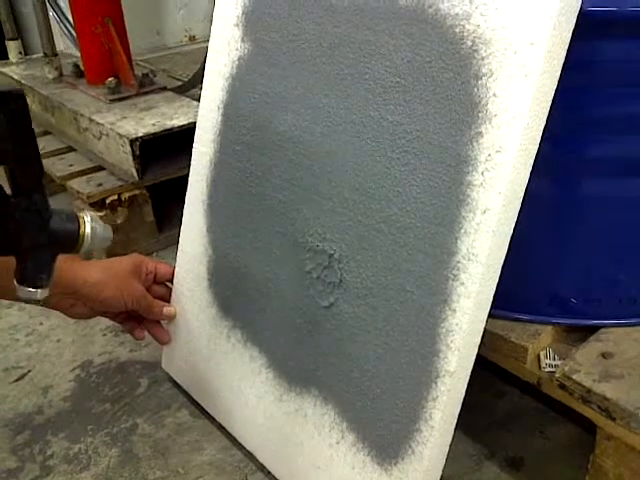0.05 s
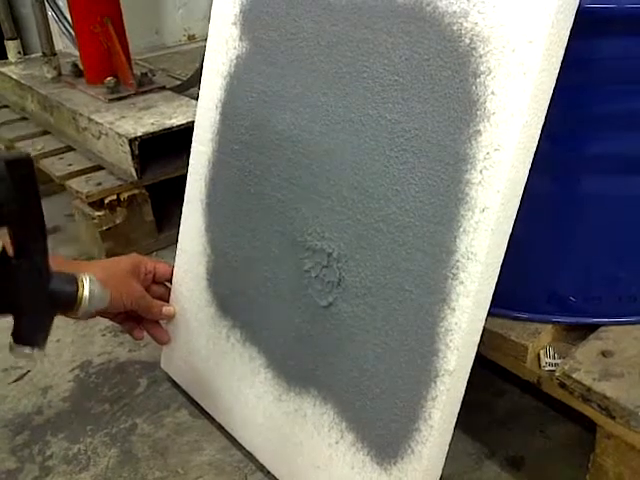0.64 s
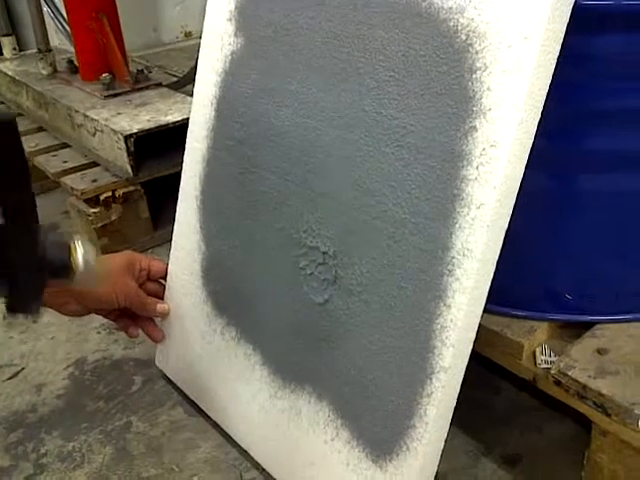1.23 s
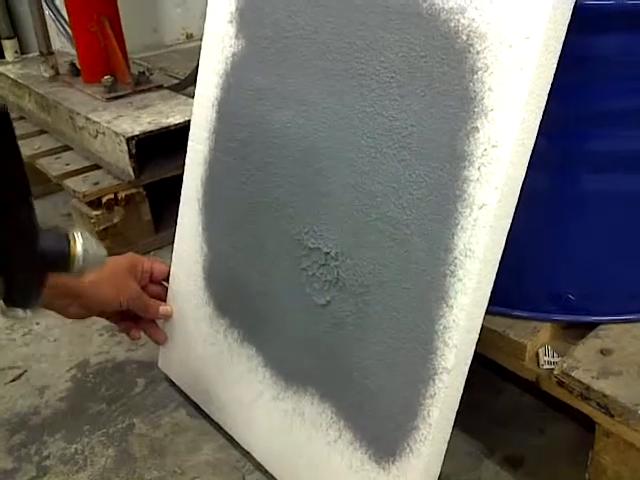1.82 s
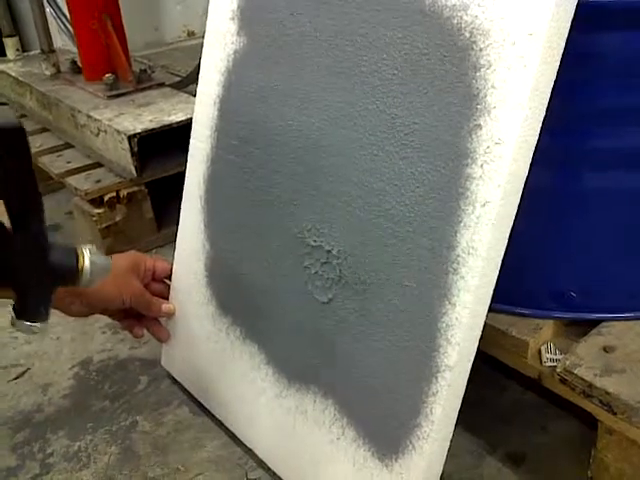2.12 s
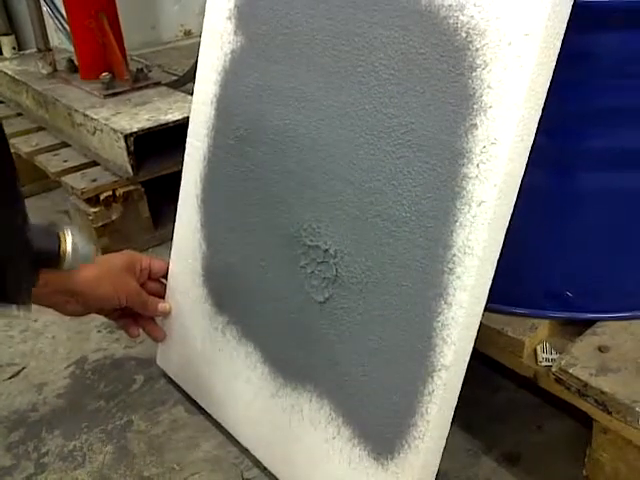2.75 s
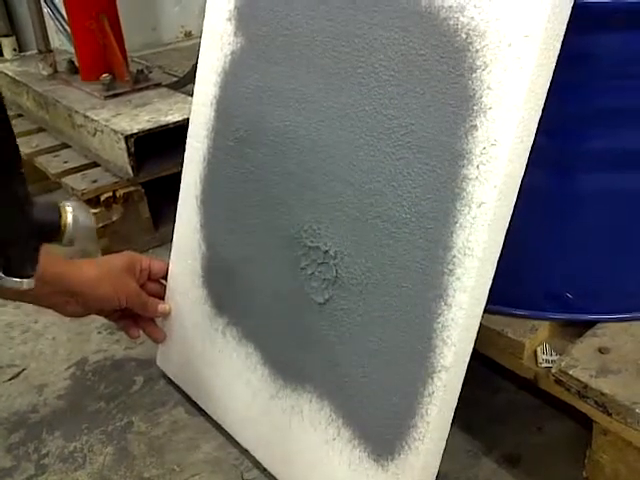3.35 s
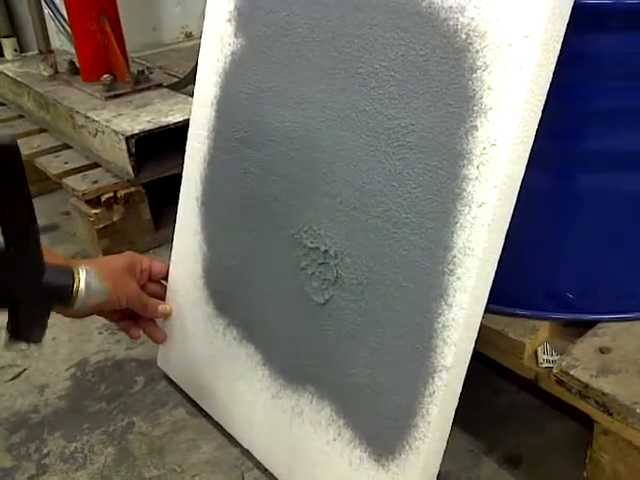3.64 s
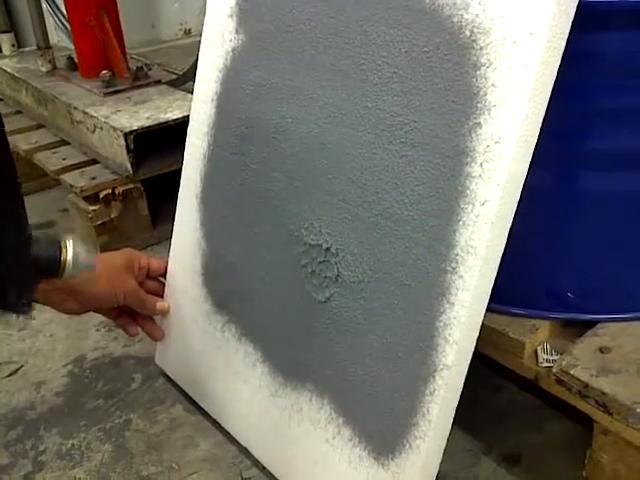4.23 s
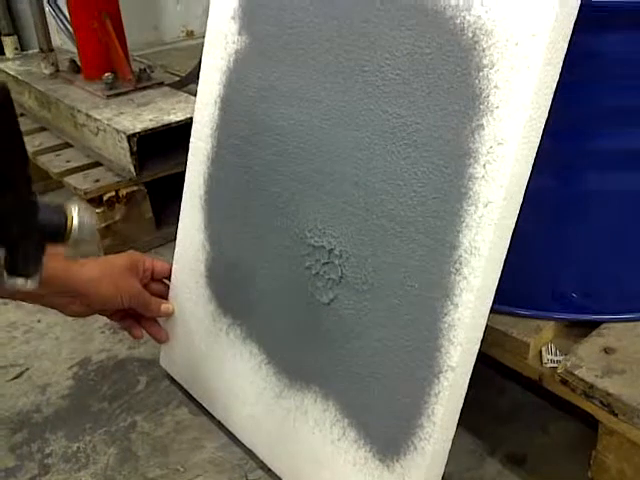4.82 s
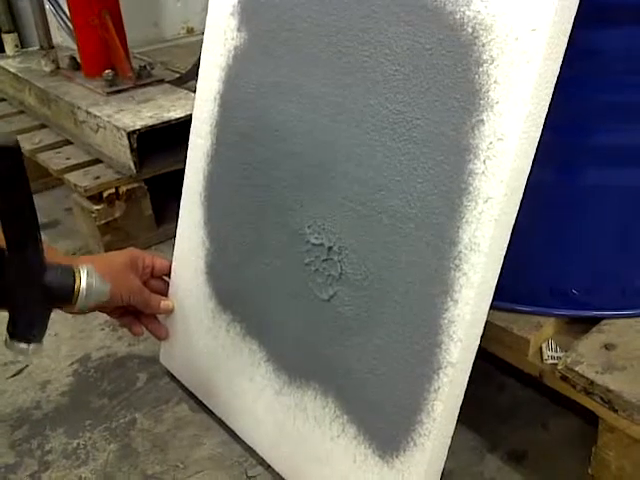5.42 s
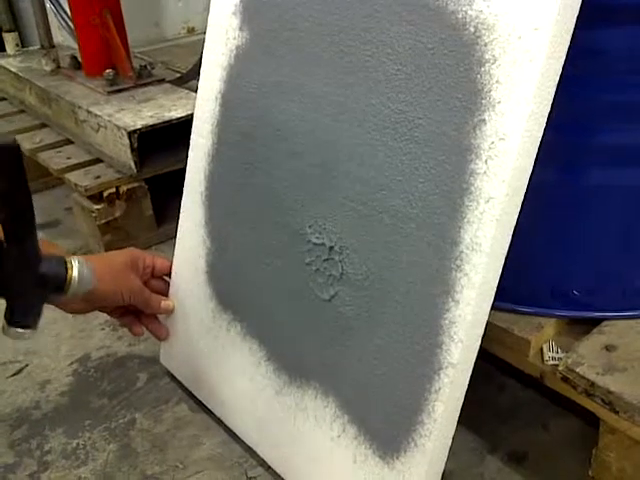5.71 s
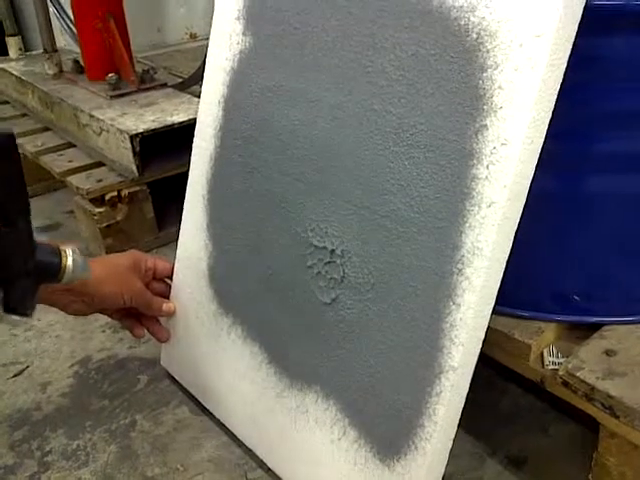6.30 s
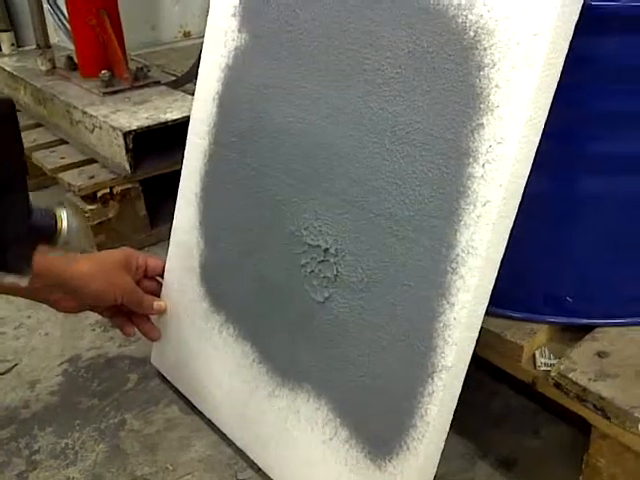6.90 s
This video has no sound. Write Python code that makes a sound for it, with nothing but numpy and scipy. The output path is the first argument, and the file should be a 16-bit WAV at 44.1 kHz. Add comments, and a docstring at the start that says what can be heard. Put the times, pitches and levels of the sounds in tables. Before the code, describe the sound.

Loud continuous hiss of a spray gun coating a board in a workshop, topped by a thin, fluttering high whistle.

```python
"""A steady hiss with a whistle near 3.6 kHz: a compressed-air spray gun coats a board in a workshop.
The turbulent jet roars and hisses; the nozzle now locks to a note, now is torn into a band by
turbulence, and a fainter note wanders below it. The gun sweeps to and fro; near 5.8 s a change of
grip recolours the hiss. A machine hums faintly behind."""
import sys
import numpy as np
from scipy import signal
from scipy.fft import rfft, irfft, next_fast_len
from scipy.io import wavfile
from scipy.ndimage import uniform_filter1d, map_coordinates

SR = 44100
rng = np.random.default_rng(int(sys.argv[2]) if len(sys.argv) > 2 else 0)


def generate_wav(sig):
    """Save sig (samples, or channels by samples) to the path in sys.argv[1] as 16-bit PCM at SR."""
    pcm = np.round(np.clip(np.atleast_2d(sig).T, -1, 1) * 32767).astype(np.int16)
    wavfile.write(sys.argv[1], SR, pcm)


N = 311346
TIME_S = np.arange(N) / SR

# swings of the gun toward the board: centre_s, length_s, hiss_swell_db, whistle_dip_db
SWINGS = [(0.72, .2, 0.3, 1.5), (1.62, 0.24, 0.2, 3.5), (2.61, 0.16, 0.6, 2), (2.92, .15, 0.6, 2),
          (3.39, .14, 0.5, 1.5), (3.75, .18, 0.4, 1.5), (4.39, .14, 0.6, 4), (4.6, 0.2, 0.4, 0),
          (4.9, .08, 0.2, 3.3), (5.46, .2, 0.6, 0.6), (6.36, 0.17, 0.6, 0)]


def amp(db):
    """Decibels to gain."""
    return 10 ** (np.asarray(db) / 20)


def unit(x):
    """Scale to rms 1."""
    return x / np.sqrt(np.mean(x ** 2) + 1e-20)


def log_interp(points, hz):
    """Interpolate (hz, value) points on a log axis."""
    points_hz, values = np.transpose(points)
    return np.interp(np.log(hz + 1), np.log(points_hz + 1), values)


def curves(rows):
    """One value per sample for each column after time_s."""
    time_s, *columns = np.transpose(rows)
    return [np.interp(TIME_S, time_s, column) for column in columns]


def wobble(knots_per_s):
    """Smooth random curve."""
    return map_coordinates(rng.standard_normal(N // 10), [np.arange(N) * knots_per_s / SR], mode="wrap")


def filtered(x, response):
    """Zero-phase filter with gain response(hz)."""
    size = next_fast_len(N + SR // 2)
    return irfft(rfft(x, size) * response(np.fft.rfftfreq(size, 1 / SR)), size)[..., :N]


def bumps(rows, x, column=0):
    """Sum of bells over time or frequency; rows are centre, width, heights; column picks the height."""
    return sum(heights[column] * .5 ** ((2 * (x - centre) / width) ** 2)
               for centre, width, *heights in rows)


def echo(x, delay_s, sway_s, sways_per_s):
    """One reflection; its path changes as the gun moves."""
    return np.interp(TIME_S - delay_s - sway_s * wobble(sways_per_s), TIME_S, x, left=0)


def turbulence(patchy_db=.58):
    """White noise whose strength drifts in patches of time and frequency."""
    spectrum = signal.stft(rng.standard_normal(N), nperseg=512)[2]
    patches = uniform_filter1d(rng.standard_normal(spectrum.shape), size=5, axis=0)
    patches = uniform_filter1d(patches, size=36, axis=1)
    spectrum = spectrum * amp(patchy_db * unit(patches))
    return unit(signal.istft(spectrum, nperseg=512)[1][:N])


def tilt_peaks(air):
    """Tilting the gun lifts or sinks two peaks of the roar; a high sizzle flares now and then."""
    # tilts between strokes: centre_s, length_s, hollow_db, body_db
    tilts = [(0.153, .2, 2, 0.5), (0.722, 0.22, 3, -1.5), (1.997, .22, -2.5, 1.5), (2.421, 0.31, -0.5, -4),
             (3.149, .25, -0.5, -2.5), (4.065, 0.17, 4.5, -3), (4.824, .2, -2, -2.5),
             (5.152, 0.17, -.5, -0.5), (5.717, .2, 3.7, 0)]
    # sizzle flares: centre_s, length_s, gain_db
    flares = [(.74, 0.18, 3.5), (1.47, 0.22, 3.5), (3.76, 0.16, 3.5), (4.95, 0.27, 2)]
    hollow_db = bumps(tilts, TIME_S)
    body_db = bumps(tilts, TIME_S, column=1)
    sizzle_db = bumps(flares, TIME_S)
    for centre_hz, width_hz, db in ((1740, 290, hollow_db), (2300, 420, body_db), (6000, 300, sizzle_db)):
        band = filtered(air, lambda hz: bumps([(centre_hz, width_hz, 1)], hz))
        air = air + (amp(db) - 1) * band
    return air


def jet(roar_db=-21.5, hiss_db=-24, split_hz=3600, flutter_db=.44):
    """Large eddies roar, small ones hiss; the gun's position colours both."""
    # jet spectrum: freq_hz, density_db
    spectrum = [(25.0, -30), (55.0, -27), (80.0, -22.5), (140.0, -17.5), (240, -19.5), (365, -16.5),
                (470.0, -18), (510.0, -10.5), (850.0, -8), (950.0, -4.5), (1500.0, -2), (3000.0, -1),
                (4800.0, 3.5), (6100.0, -3.5), (6800.0, -7), (7400.0, -20.5)]
    # fixed ripple from the leaning board and floor: centre_hz, width_hz, gain_db
    board = [(198, 30, -1.5), (425, 70, -2.4), (700, 90, -2), (780, 60, 1.4), (868, 60, -2.4),
             (1075, 90, -1.4), (1290, 70, -1.3)]
    # peaks and notches from gun body and board, per grip: centre_hz, width_hz, gain_db
    first_grip = [(1480, 230, 2.5), (1738, 87, 3.5), (1920, 160, -1.5), (2304, 270, 3.5),
                  (2570, 170.0, -1.9), (2770, 100, 3.5), (3080, 69, -5), (3370, 370, 1.8),
                  (4270, 100, -6.5), (5490, 390, -1.5), (6020, 210.0, 2.6)]
    second_grip = [(1150, 90, -2.5), (1620, 110, -2), (1850, 290, 4), (2260.0, 140.0, -5),
                   (2650, 190.0, -4.5), (2880, 150, 3.5), (3100, 90.0, -4.5), (3300, 70, 4.5),
                   (3360, 90, -7), (3860, 150, 6.5), (4070, 80, -5.5), (4180, 190, -3), (4610, 130, -2.7),
                   (4920, 210, 3.5), (5270, 520, -3.5), (6040, 170, 3), (6320, 200, 0)]
    # change of grip: time_s, second_share
    grip_change = [(5.65, 0.03), (5.92, 0.78)]
    second_share, = curves(grip_change)
    noise = turbulence()
    first, second = (filtered(noise, lambda hz: amp(log_interp(spectrum, hz) + bumps(board + grip, hz)))
                     for grip in (first_grip, second_grip))
    air = tilt_peaks((1 - second_share) * first + second_share * second)
    air = air + amp(-19) * echo(air, delay_s=.0042, sway_s=.00012, sways_per_s=3)  # floor bounce
    roar = filtered(air, lambda hz: 1 / (1 + (hz / split_hz) ** 10))
    swell_db = bumps(SWINGS, TIME_S)
    roar_gain = amp(roar_db + .6 * swell_db - second_share)  # second grip is softer
    hiss_gain = amp(hiss_db + swell_db - .4 * second_share)
    spray = roar_gain * unit(roar) + hiss_gain * unit(air - roar)
    return spray * amp(flutter_db * wobble(40))  # coating feeds unevenly


def workshop(x, count=14, span_s=.07, t60_s=.52, room_db=-5):
    """Direct sound plus reflections from board, floor and walls."""
    delays_s = span_s * (np.arange(count) + rng.uniform(size=count)) / count
    paths = (amp(-60 * delay_s / t60_s) * echo(x, delay_s, sway_s=.0001, sways_per_s=4)
             for delay_s in delays_s)
    return x + amp(room_db) * unit(sum(paths))


def unsteady_tone(pitch_hz, shake_db, shakes_per_s):
    """Gliding sine of randomly shaken strength, rms 1."""
    phase = 2 * np.pi * np.cumsum(pitch_hz) / SR
    return unit(np.sin(phase) * amp(shake_db * wobble(shakes_per_s)))


def whistle(waver_hz=17, sputter_db=.4):
    """Nozzle oscillation, shaken in pitch and strength by the turbulent flow."""
    # nozzle note: time_s, pitch_hz
    note = [(0, 3600), (.8, 3602), (1.1, 3592), (1.55, 3614), (1.95, 3602), (2.15, 3592), (2.45, 3622),
            (2.8, 3594), (3.38, 3615), (3.55, 3578), (3.7, 3610), (4.0, 3602), (4.58, 3616), (4.85, 3590),
            (5.0, 3598), (5.3, 3590), (5.47, 3608), (5.72, 3562), (5.88, 3578), (6.0, 3548), (6.3, 3556),
            (6.44, 3604), (6.6, 3576), (6.78, 3586), (6.98, 3542)]
    # nozzle strength: time_s, level_db
    singing = [(0, -25), (0.13, -24), (0.22, -23.5), (.5, -23), (1.0, -21.5), (1.35, -22.5), (2.1, -22.5),
               (2.4, -21.5), (2.75, -23), (3.15, -19), (3.6, -22), (3.95, -21), (4.17, -23), (4.6, -20.5),
               (4.9, -22), (5.42, -23), (5.9, -19), (6.2, -19.5), (6.5, -19.5), (7, -18)]
    # whistle locks on and surges: centre_s, length_s, gain_db, sag_hz
    surges = [(0.292, 0.16, 3, 4), (0.58, 0.11, 3.5, 8), (0.794, 0.1, 3.5, 0), (1.069, 0.1398, 2, 18),
              (1.251, 0.15, 3.5, 0), (1.443, .08, 3.5, 0.5), (1.886, 0.16, 4, -8), (2.051, .11, 2.5, 10),
              (2.699, 0.054, 4, 55), (2.799, 0.088, 4, 0.5), (3.061, .1, 0, 15.5), (3.203, 0.0899, -1, 45),
              (3.876, 0.084, -0.6, 35), (4.76, .11, 2, 14.5), (5, .11, 2.5, 1), (5.24, .22, 3, 28),
              (6.162, .06, 1.4, 31), (6.322, 0.069, 1.8, 34.5), (6.772, 0.13, 0.5, -11),
              (7.001, 0.079, 1, 9.5)]
    # nozzle turbulence, low = locked note, high = torn band: time_s, base_jitter_hz
    tearing = [(.3, 47.8), (.85, 62), (1.1, 45.6), (1.35, 50), (1.6, 44.1), (2.08, 51.4), (2.42, 88.6),
               (2.78, 43.9), (3.0, 78), (3.55, 54), (3.95, 67.5), (4.65, 61.6), (4.86, 82), (5.1, 46),
               (5.55, 49.7), (5.95, 70), (6.12, 50), (6.33, 45.9), (6.55, 60.2), (6.75, 45.9), (6.93, 56)]
    surge_db = bumps(surges, TIME_S)
    sag_hz = bumps(surges, TIME_S, column=1)
    dip_db = bumps(SWINGS, TIME_S, column=1)
    level_db = curves(singing)[0] + surge_db - dip_db + sputter_db * wobble(16)
    jitter_hz = curves(tearing)[0] * amp(-surge_db)  # harder surge, purer note
    pitch_hz = curves(note)[0] - sag_hz + waver_hz * wobble(58)
    eddies = .8 * wobble(150) + wobble(330)
    # the cavity pulls the note back to pitch within some 25 ms
    eddies = eddies - .8 * uniform_filter1d(eddies, size=SR // 40)
    tone = unsteady_tone(pitch_hz + jitter_hz * eddies, shake_db=-.86, shakes_per_s=280)
    tone = workshop(tone)
    # echoes beat against the direct note; only the fast chatter is kept
    slow_rms = np.sqrt(np.abs(uniform_filter1d(tone ** 2, size=SR // 10)))
    return amp(level_db) * tone / slow_rms


def side_whistle(jitter_hz=45):
    """Faint, sputtering second note that wanders below the main one as the gun swings."""
    # glide of the lower note: time_s, pitch_hz, level_db
    glide = [(0, 3380, -32), (.25, 3250, -35), (.44, 3420, -30), (.68, 3320, -33), (.85, 3450, -30.5),
             (1.0, 3270, -32), (1.22, 3190, -32.5), (1.37, 3370, -31), (1.58, 3270, -43), (1.78, 3390, -32),
             (1.95, 3260, -36), (2.12, 3210, -27), (2.25, 3430, -28), (2.47, 3470, -27), (2.75, 3390, -39),
             (2.92, 3340, -31), (3.05, 3480, -29), (3.28, 3410, -33.5), (3.53, 3240, -38),
             (3.85, 3430, -29), (4.15, 3320, -31), (4.45, 3380, -32), (4.65, 3460, -35),
             (4.84, 3400, -25.5), (5.07, 3270, -31), (5.25, 3270, -38), (5.42, 3220, -36.5),
             (5.64, 3210, -37), (5.85, 3400, -24), (6.1, 3470, -32), (6.55, 3470, -33), (6.75, 3500, -34),
             (6.93, 3460, -24)]
    pitch_hz, level_db = curves(glide)
    tone = unsteady_tone(pitch_hz + jitter_hz * wobble(220), shake_db=3, shakes_per_s=60)
    return amp(level_db) * unit(workshop(tone))


def machine(drift_hz=1.5):
    """Faint, slightly unsteady machine hum."""
    # hum lines: pitch_hz, level_db
    hum = [(77, -68), (100, -67), (129, -63), (157, -67.5), (294, -58.5)]
    return sum(amp(level_db) * unsteady_tone(pitch_hz + drift_hz * wobble(6), shake_db=2.5, shakes_per_s=5)
               for pitch_hz, level_db in hum)


def scene():
    """Gun and machine, mono."""
    return (jet() + whistle() + side_whistle() + machine())[None]


def record(dry, target_db=-16.7, control_share=.4, top_hz=7470):
    """Gain control pulls the level partway to the target; a steep low-pass follows."""
    rms = np.sqrt(np.abs(uniform_filter1d(dry ** 2, size=SR // 6)) + 1e-12)
    levelled = dry * (amp(target_db) / rms) ** control_share
    return filtered(levelled, lambda hz: amp(-np.clip(hz - top_hz, 0, 600) / 5))


dry = scene()
out = record(dry)
generate_wav(out)
```